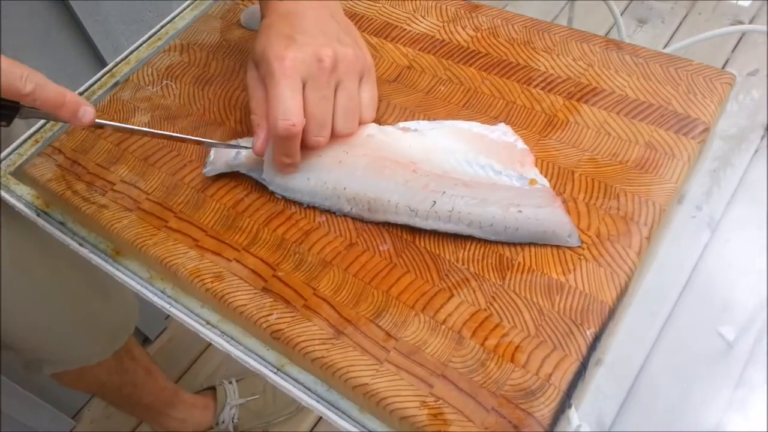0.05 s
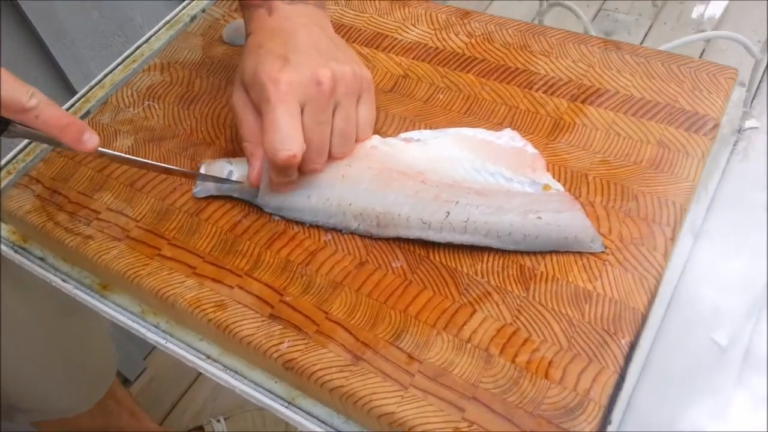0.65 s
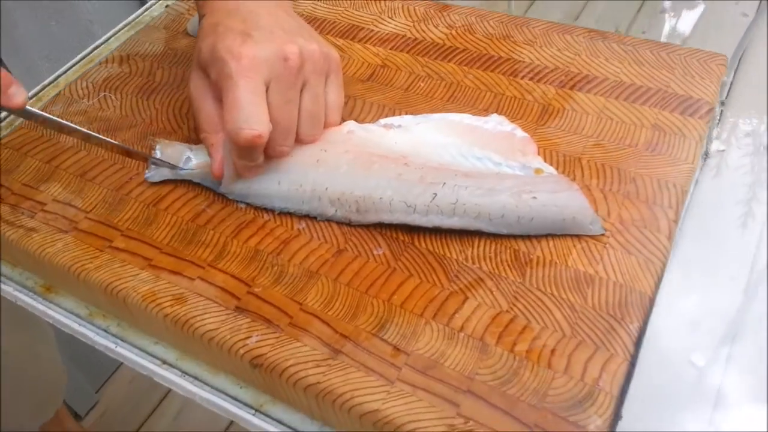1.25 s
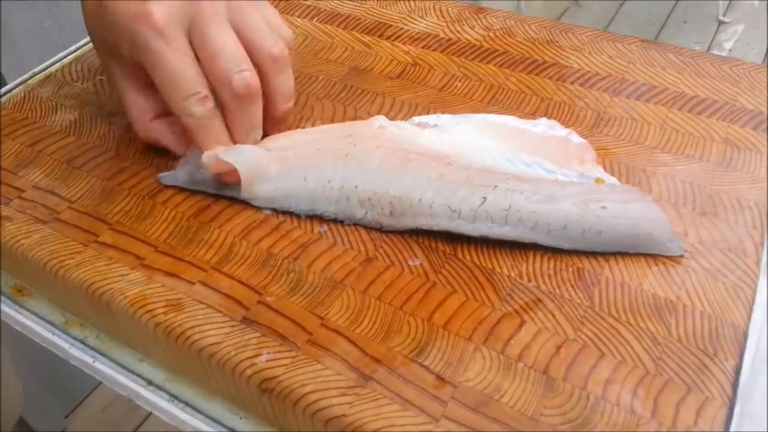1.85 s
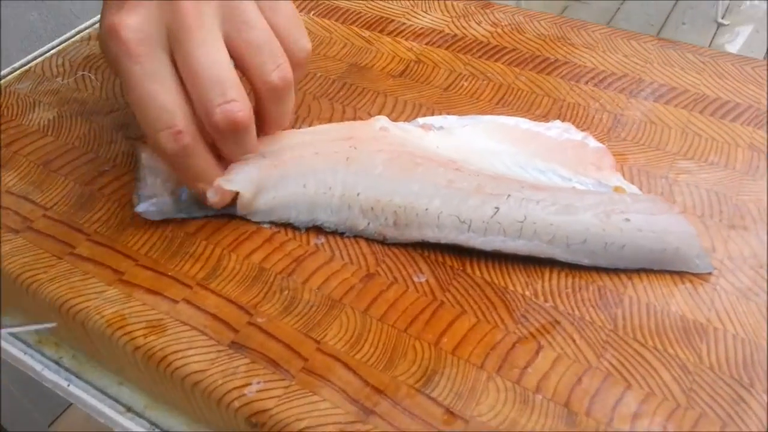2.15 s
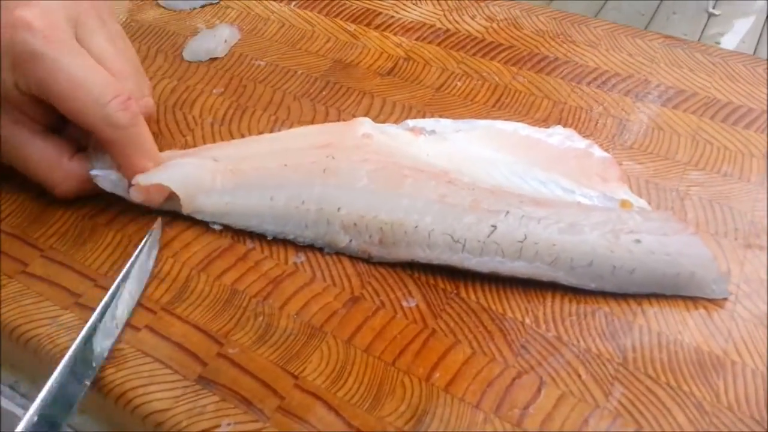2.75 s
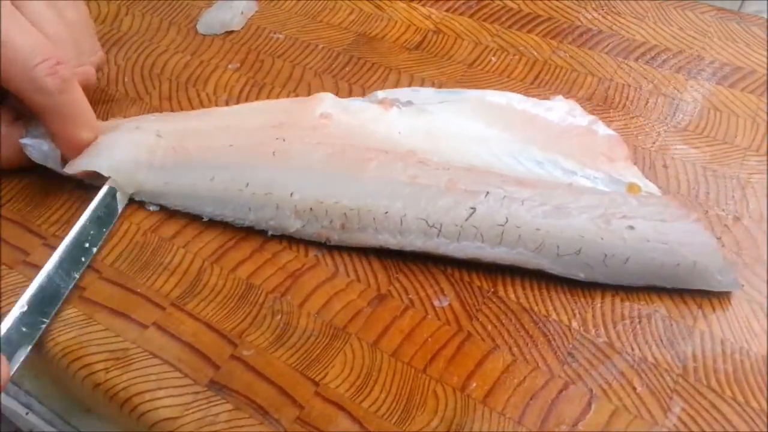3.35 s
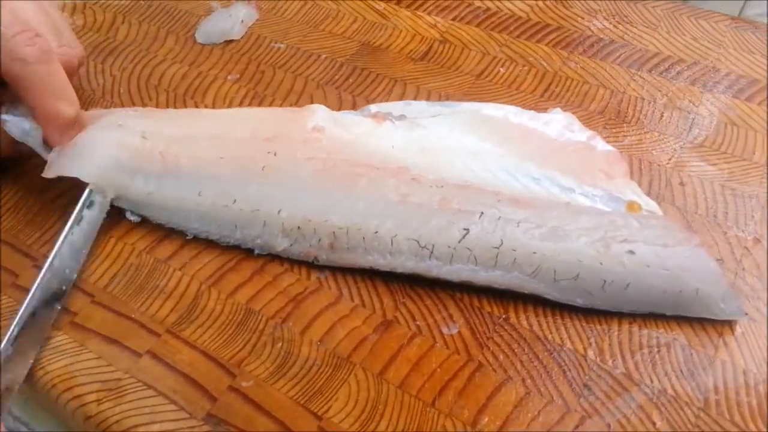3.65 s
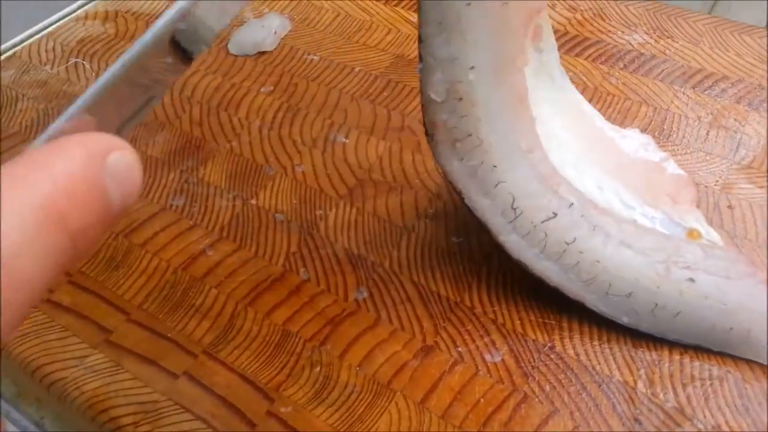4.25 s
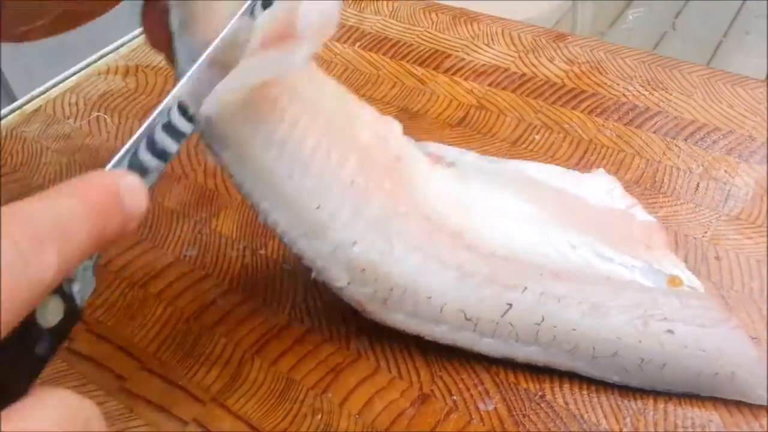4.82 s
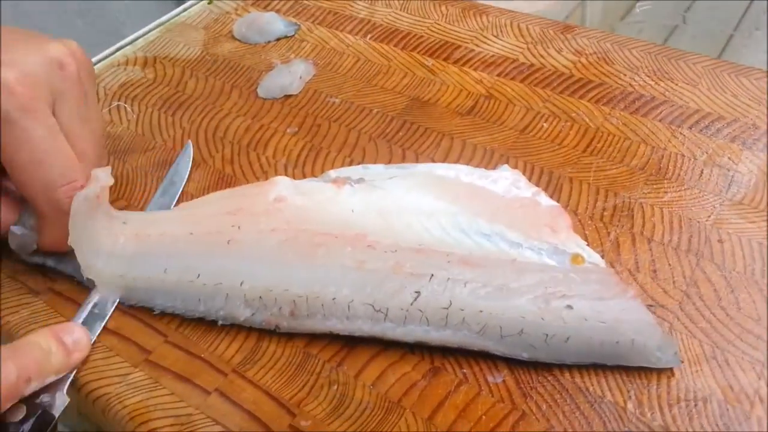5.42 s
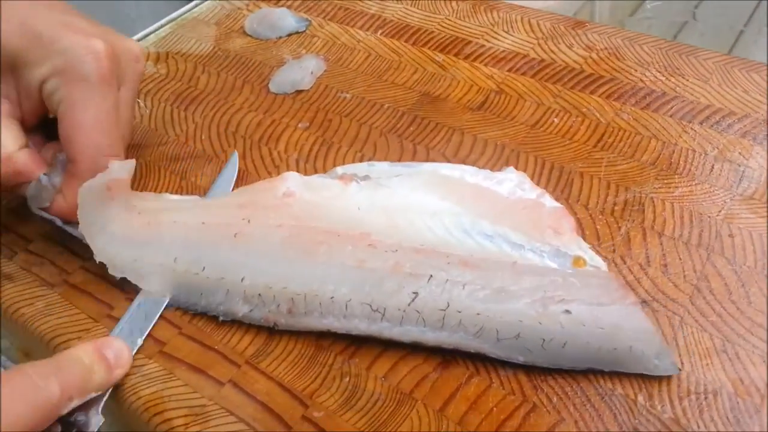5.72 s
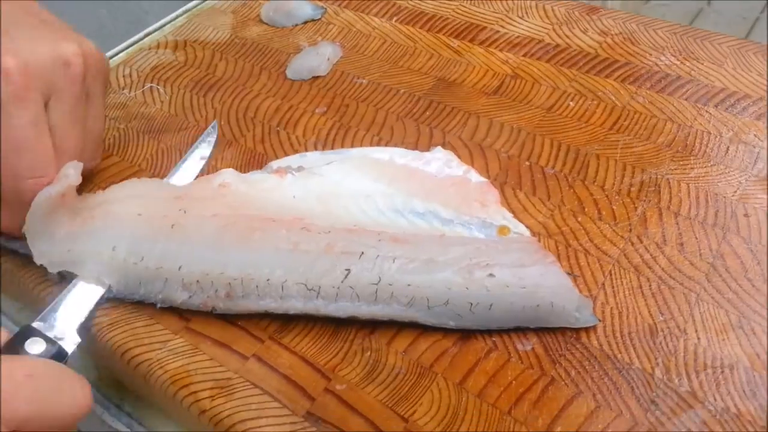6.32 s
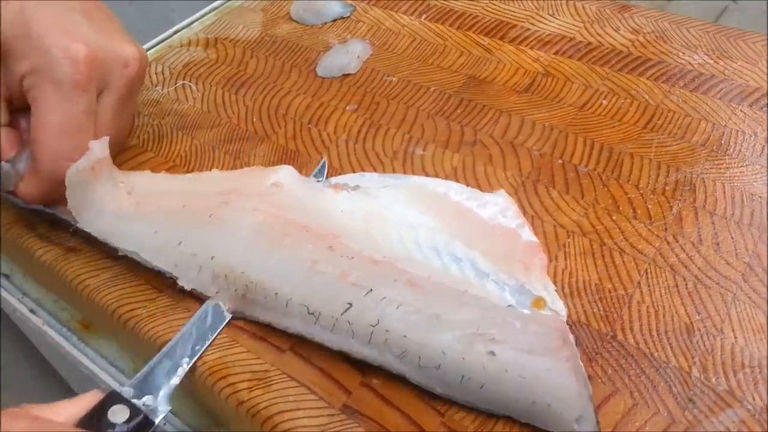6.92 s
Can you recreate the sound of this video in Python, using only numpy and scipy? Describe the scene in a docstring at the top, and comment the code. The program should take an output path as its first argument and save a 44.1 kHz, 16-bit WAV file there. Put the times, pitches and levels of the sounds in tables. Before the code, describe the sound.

A thin knife skins a fish on a thick wooden board, heard from close by. Soft wet hisses and brief sawing scrapes come first, then the strokes grow louder, with sticky crackle, tiny clicks and small squelches as the flesh peels loose. Near the end the blade rasps more on the wood, and three short knocks stand out. A faint low hum lies underneath.

```python
"""Short wet hisses, sticky crackle and a few wooden knocks: a thin knife skins a fish on a thick board.
Each push of blade or fingers hisses on the flesh and rasps on the wood under it. As the flesh peels
from the skin, fibres tick, wet films click and small squelches suck loose. Knife and hand knock on
the board, and brief sawing strokes make the blade chatter. Heard from close by, in stereo,
over a faint low hum and a thin high whine."""
import sys
import numpy as np
from scipy import signal
from scipy.fft import rfft, irfft, next_fast_len
from scipy.io import wavfile
from scipy.ndimage import uniform_filter1d, map_coordinates

SR = 44100
rng = np.random.default_rng(int(sys.argv[2]) if len(sys.argv) > 2 else 0)


def transcribe(u):
    """Save the signal u as a 16-bit wav file named by the first command-line argument.

    u: samples, shape (n,) or (channels, n), limited to [-1, 1]; the rate is SR.
    q: integer samples, one column per channel.
    """
    v = np.clip(np.atleast_2d(u).T, -1, 1)
    q = np.round(v * 32767).astype(np.int16)
    wavfile.write(sys.argv[1], SR, q)


N = 307818

# ringing tones of a wooden knock, coloured by a close echo:
# (frequency [Hz], relative level [dB], t60 [s])
WOOD_TONES = [(71.8, -25, 0.49), (201.3, -22, 0.35), (242, -17, 0.15), (430.2, -16.5, 0.25), (574, 2, 0.04),
              (781, -4, 0.042), (836, -4.5, 0.046), (962, -5, 0.016), (1175, 1.5, 0.038), (1389, 10, 0.016),
              (1620, -14, 0.028), (2025, -4, 0.035)]


def pushes():
    """Gains of wet hiss and wood rasp: each push of blade or fingers rises, holds and dies away."""
    # pushes: (start [s], length [s], hiss level [dB], rasp level [dB], t60 [s])
    strokes = [(0.093, 0.016, -55.5, -70, 0.65), (0.604, 0.024, -57, -78, 0.5),
               (0.67, 0.11, -53, -65.5, 0.048), (1.018, 0.046, -60, -61, 0.37),
               (1.072, 0.091, -48.5, -60, 0.15), (1.214, 0.08, -63, -72.5, 0.96),
               (1.401, 0.012, -50.5, -55, 0.26), (1.43, 0.29, -61.5, -74.5, 0.29),
               (1.621, 0.034, -44, -56.5, 0.32), (1.722, 0.02, -42, -47, 0.062),
               (1.792, 0.016, -44.5, -48.5, 0.1), (1.854, 0.68, -66, -74, 0.3),
               (2.036, 0.16, -58.5, -70.5, 0.18), (2.257, 0.027, -59.5, -77, 0.21),
               (2.345, 0.028, -52, -70, 0.14), (2.422, 0.088, -55, -69.5, 0.17),
               (2.544, 0.11, -48.5, -57.5, 0.18), (2.713, 0.12, -54.5, -65, 0.74),
               (2.908, 0.087, -58.5, -69.5, 0.27), (3.067, 0.36, -49, -59.5, 0.3),
               (3.316, 0.036, -40, -55.5, 0.35), (3.723, 0.032, -54.5, -58, 0.43),
               (3.829, 0.035, -48, -57, 0.12), (3.858, 0.048, -37, -51.5, 0.42),
               (4.072, 0.049, -57, -64, 0.47), (4.189, 0.13, -48, -62, 0.19),
               (4.423, 0.045, -63.5, -76.5, 0.13), (4.593, 0.18, -60, -67.5, 0.18),
               (4.624, 0.02, -38.5, -55, 0.031), (4.792, 0.022, -53.5, -72, 0.4),
               (4.901, 0.16, -49, -64.5, 0.65), (5.029, 0.053, -41, -53.5, 0.15),
               (5.12, 0.16, -54.5, -71.5, 1), (5.324, 0.28, -54, -68, 0.095),
               (5.617, 0.23, -47.5, -59, 0.19), (5.781, 0.06, -37.5, -55.5, 0.1),
               (5.884, 0.19, -42.5, -55, 0.26), (6.173, 0.03, -52.5, -67.5, 0.11),
               (6.309, 0.2, -60, -73.5, 0.22), (6.451, 0.058, -52, -59.5, 0.16),
               (6.539, 0.31, -48.5, -56, 0.41), (6.6, 0.081, -43, -54, 0.22),
               (6.734, 0.045, -44, -54.5, 0.11), (6.841, 0.11, -38.5, -49, 0.31)]
    attack_s = 0.018
    t, power = np.arange(N) / SR, np.zeros((2, N))
    for start_s, length_s, hiss_db, rasp_db, t60_s in strokes:
        rise = np.clip((t - start_s) / attack_s, 0, 1)
        decay = amp(-60 * np.clip((t - start_s - length_s) / t60_s, 0, 2))
        power += (amp([[hiss_db], [rasp_db]]) * rise * decay) ** 2
    return np.sqrt(power + 1e-20)


def slicing(gain):
    """Countless slips hiss, brighter where the flesh sticks; tearing fibres add crisp ticks."""
    # sliding over sticky flesh: (time [s], share [0-1])
    sticky_share = [(0.1, 0.9), (1.1, 0.05), (3.1, 0.12), (3.6, 0.4), (3.85, 0.96), (4.3, 0.77),
                    (5.5, 0.27), (6.6, 0.43)]
    # plain sliding spectrum: (frequency [Hz], density [dB])
    rub_spectrum = [(120, -14.5), (400, -18), (1400, -12), (2500, -14.5), (3700, -8), (5000, -3.5),
                    (7000, -3.5), (14000, -10)]
    # sticky peeling spectrum: (frequency [Hz], density [dB])
    peel_spectrum = [(1500, -38), (2900, -26), (3700, -8.5), (7500, 4), (14000, -4)]
    # fibre ticks: (time [s], level relative to the hiss [dB])
    crackle_db = [(0.7, -18), (1.3, -6.5), (3.2, -3), (3.9, -2), (5.5, -5)]
    tack = curve(sticky_share)
    rub = coloured(grains(rate_hz=4500, spread_db=3.5, life_s=.0006, alike=.03), rub_spectrum)
    peel = coloured(grains(rate_hz=2800, spread_db=4, life_s=.0003, alike=.03), peel_spectrum)
    ticks = coloured(grains(rate_hz=110, spread_db=3.2, life_s=.0004, alike=.2), peel_spectrum)
    hiss = wet_gaps(np.sqrt(1 - tack) * rub + np.sqrt(tack) * peel, depth_db=2.6)
    tremor = amp(0.48 + 1.9 * wobble(60))
    return gain * (tremor * hiss + amp(curve(crackle_db)) * ticks)


def wet_gaps(x, depth_db):
    """The colour of x drifts as wet gaps open and close."""
    spectra = signal.stft(x, nperseg=256)[2]
    drift = uniform_filter1d(rng.standard_normal(spectra.shape[1:]), size=7, axis=0)
    drift = uniform_filter1d(drift, size=9, axis=1)
    return unit(signal.istft(spectra * amp(depth_db * unit(drift)), nperseg=256)[1][:, :N])


def clicks():
    """A wet film, too small for low sound, snaps in about a millisecond; a little spatter follows."""
    # snapping films: (time [s], relative peak [dB])
    snaps = [(1.266, -39), (1.306, -27.5), (1.839, -39), (1.974, -36), (3.146, -28), (3.215, -23),
             (3.2285, -21), (3.275, -31.5), (3.324, -19), (3.343, -19.5), (3.352, -17), (3.4155, -32.5),
             (3.7445, -29.5), (3.7541, -29.5), (3.7661, -32), (3.871, -28), (3.884, -24), (3.902, -24.5),
             (3.9755, -27), (4.018, -33.5), (4.057, -38), (4.097, -30), (4.26, -28.5), (4.2703, -30),
             (4.2885, -28.5), (4.961, -34.5), (5.3128, -31.5), (5.347, -33), (5.608, -32.5), (5.7758, -25),
             (5.8073, -16.5), (5.817, -20), (5.9264, -20.5), (5.98, -23.5), (6.424, -36.5), (6.5948, -24.5),
             (6.825, -29.5), (6.858, -32), (6.882, -27)]
    out, t = np.zeros((2, N)), np.tile(np.arange(SR // 25) / SR, (2, 1))
    snap, spatter = amp(-60 * t / .004), amp(-20 - 60 * t / .03)
    for start_s, db in snaps:
        centre_hz = 7300 * np.exp(.08 * rng.standard_normal())
        add(out, start_s + 0.00049, amp(db + 5.5) * burst(snap + spatter, centre_hz, q=2.8))
    return highpass(out, 4400)


def squelches():
    """Flesh sucks loose from board or blade: a short fizzing swell, slower and lower than a snap."""
    # flesh coming loose: (time [s], relative peak [dB], centre [Hz])
    releases = [(1.0855, -37.5, 4700), (2.5615, -27.5, 5070), (2.937, -36.5, 4740), (3.112, -24.5, 5830),
                (3.784, -37, 5800), (3.846, -34.5, 5660), (4.694, -36.5, 7700), (4.7608, -36, 9200),
                (5.43, -31.5, 6950)]
    out, t = np.zeros((2, N)), np.tile(np.arange(SR // 25) / SR, (2, 1))
    suck = np.sqrt(t) * np.exp(-t / .003)
    for start_s, db, centre_hz in releases:
        add(out, start_s, amp(db + 3) * burst(suck, centre_hz, q=2))
    return highpass(out, 3200)


def knocks():
    """A blow gives a contact tick, a thud of the damped board, a clatter and short ringing tones."""
    # blows on the board: (time [s], relative level [dB], centre [Hz], Q [-])
    blows = [(1.9365, -36, 620, 0.63), (1.946, -29, 239, 2.6), (2.5951, -27.5, 201, 1.4),
             (2.641, -40.5, 226, 1.5), (2.848, -32, 1190, 0.22), (5.6771, -9.5, 848, 0.61),
             (6.508, -12.5, 800, 1.83), (6.7993, -9, 846, 1.26)]
    out, t = np.zeros((2, N)), np.arange(SR * 3 // 4) / SR
    rise = 1 - np.exp(-t / 0.0011)  # the heavy board takes a moment to move
    tick_decay = np.tile(amp(-60 * t / 0.004), (2, 1))
    for start_s, db, centre_hz, q in blows:
        hardness = centre_hz / 1000  # softer blows swell slower and tick far less
        ring = rise * ringing(WOOD_TONES, centre_hz, q)
        swell = t / 0.0019 * np.sqrt(hardness)
        thud = amp(-9) * swell * np.exp(1 - swell) * np.sin(2 * np.pi * centre_hz * t)
        clatter = amp(-8) * burst(rise * amp(-60 * t * centre_hz / 30), centre_hz, q=2)
        tick = amp(-2) * hardness ** 3 * burst(tick_decay, centre_hz=2800, q=1)
        add(out, start_s, amp(db - 5) * (ring + thud + clatter + tick))
    port_delay_s = np.array([[0], [.00016]])
    return filtered(out, lambda hz: np.exp(-2j * np.pi * hz * port_delay_s))


def rasp(gain):
    """Rubbing cushioned by the fish is a dull murmur; with the blade flat on the wood, it rings."""
    # blade lying flat: (time [s], share [0-1])
    flat_share = [(3.9, 0), (5.2, 0.6), (6.5, 0.53)]
    flat = curve(flat_share)
    dull = unit(filtered(noise(0.21), lambda hz: resonance(hz, centre_hz=477, q=6)))
    hard = rubbed(WOOD_TONES, centre_hz=825, q=1.77, rate_hz=800)
    # the board shifts on its table, more under a harder push
    rumble = unit(filtered(noise(0.91), lambda hz: resonance(hz, centre_hz=129, q=0.17) ** 2))
    usual_rasp_db, usual_rumble_db = -63.5, -68.5
    rumble_gain = amp(usual_rumble_db) * (gain / amp(usual_rasp_db)) ** 0.61
    return gain * (amp(0.96) * flat * hard + amp(-9.5) * (1 - flat) * dull) + rumble_gain * rumble


def scrapes():
    """The sawing blade chatters on the wood, muffled by flesh, while its edge grates on the skin."""
    # sawing strokes: (middle [s], half length [s], level [dB])
    strokes = [(0.711, 0.02, -56), (0.732, 0.0049, -50.5), (1.046, 0.011, -59), (1.101, 0.012, -47.5),
               (1.146, 0.012, -51.5), (5.667, 0.0048, -45.5), (6.503, 0.004, -50)]
    # blade modes: (frequency [Hz], relative level [dB], t60 [s])
    blade_modes = [(572, -6, 0.24), (806.5, -7.5, 0.18), (1390, 12, 0.013), (1606, 4.5, 0.036),
                   (1752, 2.5, 0.042)]
    t = np.arange(N) / SR
    gain = sum(amp(db) * np.exp(-.5 * ((t - mid_s) / half_s) ** 2) for mid_s, half_s, db in strokes)
    chatter = rubbed(blade_modes, centre_hz=1200, q=0.12, rate_hz=900)
    muffled = unit(lowpass(chatter, edge_hz=1850, order=9))
    slips = grains(rate_hz=700, spread_db=2, life_s=.0004, alike=0)
    grit = unit(filtered(slips, lambda hz: resonance(hz, centre_hz=4800, q=1) ** 2))
    return gain * (muffled + .5 * grit)


def room(x):
    """A short diffuse tail, longest in the bass."""
    # decay of the surroundings: (frequency [Hz], t60 [s])
    decay_times = [(100, 0.32), (420, 0.2), (700, 0.1), (10000, 0.058)]
    hz, t, spectra = signal.stft(rng.standard_normal((2, SR * 3 // 4)), SR, nperseg=256)
    decay = amp(-60 * t / along(decay_times, hz)[:, None])
    tail = signal.istft(spectra * decay, SR, nperseg=256)[1]
    return signal.fftconvolve(x, tail / np.linalg.norm(tail[0]), axes=1)[:, :N]


def background():
    """Faint steady air, a low wavering hum and, on the right, a thin whine that sets in and fades."""
    # air spectrum: (frequency [Hz], density [dB])
    air_spectrum = [(15, -34), (35, -9.5), (120, -14), (380, -10), (560, -17.5), (1120, -27), (3260, -30.5),
                    (6000, -26), (15000, -18.5)]
    # hum tones: (frequency [Hz], level [dB])
    hum_tones = [(68, -82.5), (385, -81.5)]
    # whine envelope: (time [s], level [dB])
    whine_db = [(3.65, -100), (3.75, -68.5), (4.6, -73.5), (6.2, -82)]
    t = np.arange(N) / SR
    hum = sum(amp(db) * np.sin(2 * np.pi * hz * t + 3.7 * wobble(2.2)) for hz, db in hum_tones)
    whine = np.sin(2 * np.pi * 10000 * t + wobble(20)) * [[0], [1]]
    air = amp(-69) * coloured(noise(0.21), air_spectrum)
    return air + hum + amp(curve(whine_db)) * whine


def ringing(tones, centre_hz, q):
    """Decaying tones after one blow, favouring those around centre_hz."""
    t = np.arange(SR * 3 // 4) / SR
    hz, tone_db, t60_s = np.transpose(tones)[:, :, None]
    low_drive = amp(-9) / (1 + (hz / 460) ** 4)  # low tones sound wherever the blow lands
    strength = amp(tone_db) * (np.abs(resonance(hz, centre_hz, q)) ** 2 + low_drive)
    return (strength * amp(-60 * t / t60_s) * np.sin(2 * np.pi * hz * t)).sum(0)


def rubbed(tones, centre_hz, q, rate_hz):
    """Tones kept ringing by small slips, at rms 1."""
    slips = grains(rate_hz, spread_db=4.5, life_s=.0013, alike=.7)
    return unit(signal.fftconvolve(slips, ringing(tones, centre_hz, q)[None], axes=1)[:, :N])


def grains(rate_hz, spread_db, life_s, alike):
    """Tiny noise bursts at random moments and of random, bounded size, at rms 1."""
    size = amp(spread_db * np.minimum(rng.standard_normal(N), 1.5))
    hits = size * (rng.random(N) < rate_hz / SR)
    energy = signal.lfilter([1], [1, -np.exp(-2 / (life_s * SR))], hits ** 2)
    return unit(np.sqrt(energy) * noise(alike))


def burst(envelope, centre_hz, q):
    """A puff of noise around one frequency, at peak 1."""
    n = envelope.shape[-1]
    spectrum = rfft(envelope * rng.standard_normal(envelope.shape))
    puff = irfft(spectrum * resonance(np.fft.rfftfreq(n, 1 / SR), centre_hz, q), n)
    return puff / np.abs(puff).max()


def noise(alike):
    """White stereo noise with channel correlation alike."""
    return np.sqrt(alike) * rng.standard_normal(N) + np.sqrt(1 - alike) * rng.standard_normal((2, N))


def wobble(rate_hz):
    """A smooth random curve, rate_hz knots a second."""
    knots = rng.standard_normal(int(N * rate_hz / SR) + 4)
    return map_coordinates(knots, [np.arange(N) * rate_hz / SR])


def resonance(hz, centre_hz, q):
    """Response of one band-pass resonance."""
    return 1 / (1 + 1j * q * (hz / centre_hz - centre_hz / (hz + 1e-6)))


def filtered(x, response):
    """Apply a frequency response."""
    n = next_fast_len(N + SR // 4)
    return irfft(rfft(x, n) * response(np.fft.rfftfreq(n, 1 / SR)), n)[..., :N]


def coloured(x, spectrum):
    """x shaped by a spectrum table, at rms 1."""
    return unit(filtered(x, lambda hz: amp(along(spectrum, hz))))


def highpass(x, edge_hz):
    """Roll off below edge_hz."""
    return signal.sosfilt(signal.butter(4, edge_hz, "high", fs=SR, output="sos"), x)


def lowpass(x, edge_hz, order):
    """Roll off above edge_hz."""
    return filtered(x, lambda hz: 1 / np.hypot(1, (hz / edge_hz) ** order))


def along(points, hz):
    """(frequency [Hz], value) points read on a log axis."""
    points_hz, values = np.transpose(points)
    return np.interp(np.log(hz + 1), np.log(points_hz), values)


def curve(points):
    """(time [s], value) points read at every sample."""
    return np.interp(np.arange(N) / SR, *np.transpose(points))


def add(track, start_s, sound):
    """Mix a sound in at start_s."""
    start = round(start_s * SR)
    track[..., start:start + sound.shape[-1]] += sound[..., :N - start]


def amp(db):
    """Decibels to gain."""
    return 10 ** (np.asarray(db) / 20)


def unit(x):
    """Scale to rms 1."""
    return x / np.sqrt(np.mean(x ** 2) + 1e-20)


def scene():
    """Nearly dry wet sounds shift with the hands, over the board's sounds and the background."""
    # position of the work: (time [s], left minus right [dB])
    balance_db = [(1.2, -1), (1.7, -6), (2.6, -2.5), (3.35, -1.5), (3.9, -5.5), (4.7, -4.5), (5.5, -3),
                  (6.9, -2.5)]
    pan = amp(np.array([[.5], [-.5]]) * curve(balance_db))
    hiss_gain, rasp_gain = pushes()
    wet = pan * (slicing(hiss_gain) + clicks() + squelches())
    wood = knocks() + rasp(rasp_gain) + scrapes()
    return wet + amp(-19) * room(wet) + wood + amp(-11) * room(wood) + background()


def record(dry):
    """Each microphone port colours the sound with its own resonance; a steep band limit follows."""
    # left port response: (frequency [Hz], gain [dB])
    left_port = [(400, 1), (1400, 5), (2400, 5), (3900, 2.5), (5400, 2.5), (7100, -4), (8100, -9),
                 (9800, -6)]
    # right port response: (frequency [Hz], gain [dB])
    right_port = [(400, 0.5), (1400, -1.5), (3000, 1.5), (4800, -3), (7300, 2.5), (10500, -3.5),
                  (14000, -10)]
    heard = filtered(dry, lambda hz: amp([along(left_port, hz), along(right_port, hz)]))
    return lowpass(heard, edge_hz=14650, order=60)


dry = scene()
out = record(dry)
transcribe(out)
```